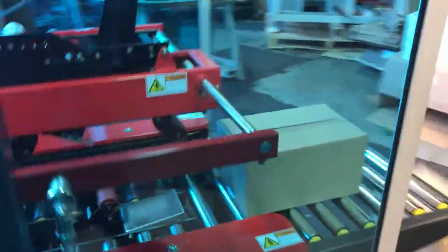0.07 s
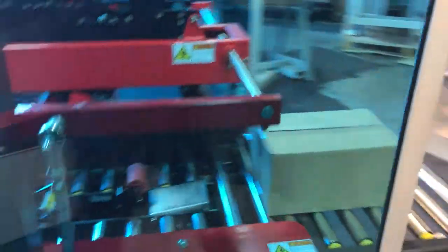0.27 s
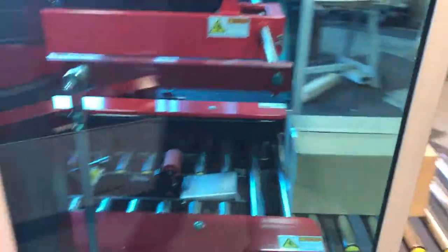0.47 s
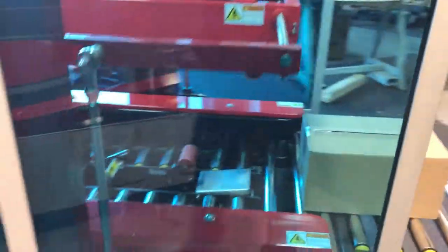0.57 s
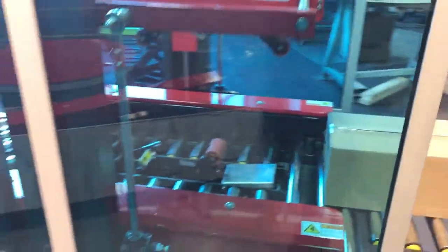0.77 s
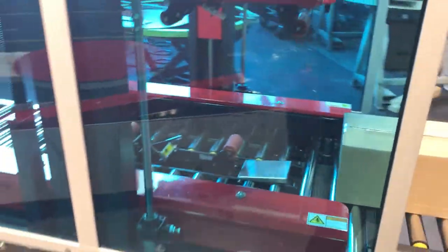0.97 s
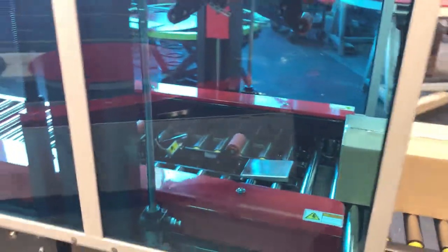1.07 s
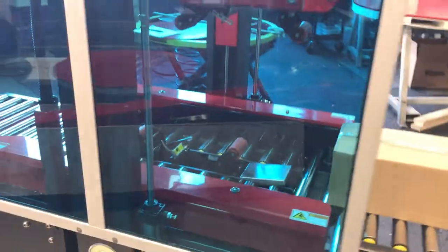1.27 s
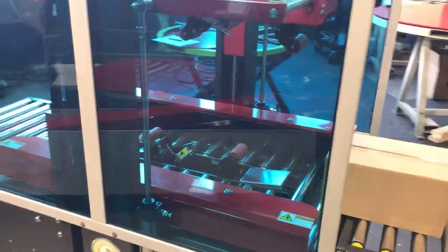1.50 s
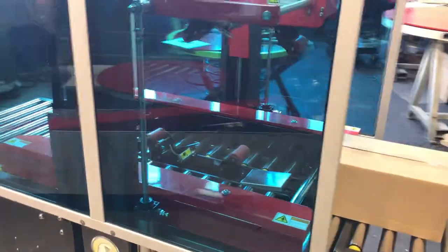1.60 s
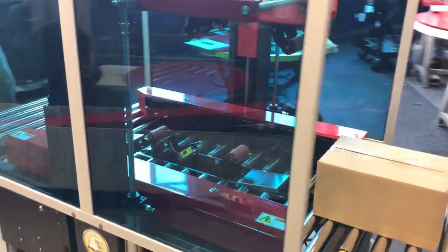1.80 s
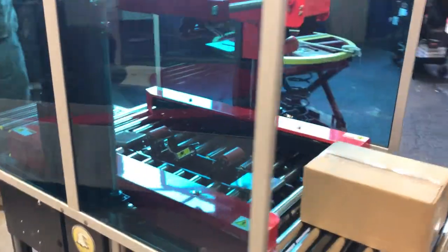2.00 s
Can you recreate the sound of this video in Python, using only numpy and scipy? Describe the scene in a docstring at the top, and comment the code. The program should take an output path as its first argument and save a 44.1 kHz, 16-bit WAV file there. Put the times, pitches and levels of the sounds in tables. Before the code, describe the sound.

A carton sealing machine hisses and clunks, then releases a loud jet of air.

```python
"""A carton sealer in a factory hall, heard close up, over the whir of its motor and belts.
Air hisses through a throttle. A steel arm clunks against its stop, rattling the guard panels and
a loose link, and the hiss goes on, whistling, while the press head lifts. The head ends its stroke
with a dull thump and a last thin hiss. Then a valve ticks and dumps the air in a loud,
sputtering jet that rings the frame and the hall."""
import sys
import numpy as np
from scipy import signal
from scipy.fft import rfft, irfft, next_fast_len
from scipy.io import wavfile
from scipy.ndimage import map_coordinates

SR = 44100
rng = np.random.default_rng(int(sys.argv[2]) if len(sys.argv) > 2 else 0)


def generate_wav(signal):
    """Clip the signal to [-1, 1] and save it as 16-bit WAV at the path in sys.argv[1]."""
    frames = np.transpose(np.atleast_2d(signal))
    scaled = np.clip(frames, -1, 1) * 32767
    pcm = np.round(scaled).astype(np.int16)
    wavfile.write(sys.argv[1], SR, pcm)


N = 90404

# Blows of the steel arm; the last row is a later rattle of the guard panels, played the same way. Each row:
# start in seconds, level in dB, thud and crack offsets in dB.
BLOWS = [(0.2234, -13, -10, 0.5), (0.2289, -14, 4, -8.5), (0.258, -32, 5, -4), (0.276, -39.5, 22.5, -11),
         (0.331, -37.5, 11, -1), (0.377, -44, 21, -3), (0.446, -38, 0, 8.5)]


def exhaust():
    """Turbulent jet noise: the valve sputters open, and the escaping air excites frame and hall."""
    # Course of the outflow. Each row: time in seconds, level in dB.
    outflow = [(1.36, -59), (1.419, -35.5), (1.426, -31), (1.48, -25.5), (1.56, -24), (1.63, -24.5),
               (1.7, -34.5), (1.8, -45), (2.0, -56.5)]
    # Spectra of the jet and its shrill edge. Each row: frequency in Hz, relative level in dB.
    jet_spectrum = [(70, -22), (120, -8), (170, -3), (245, -7), (360, -6), (520, -11.5), (600, -7.5),
                    (840, -4), (1000, -4.5), (1570, -4.5), (1810, -13.5), (2310, -7.5), (3000, -8.5),
                    (5300, -6), (8000, -15), (10400, -18), (15700, -32)]
    shrill_spectrum = [(3000, -15.5), (5200, -8), (7500, -23.5)]
    open_s, sputter_s, sputter_hz, sputter_db, turbulence_db = 1.429, 0.06, 50, 2.8, 0.9
    since = clock() - open_s
    pulsing = np.exp(-np.abs(since) / sputter_s) * np.cos(2 * np.pi * sputter_hz * since)
    sputter = amp(sputter_db * pulsing + turbulence_db * wobble(70.07))
    smooth_flow = level(outflow)
    flow = smooth_flow * sputter
    frame = frame_resonance(flow)
    fizz = sputter * port_fizz(open_s)
    tick = valve_tick()
    shrill = amp(-27) * (smooth_flow / smooth_flow.max()) ** 2 * noise(shrill_spectrum)
    return tick + fizz + shrill + frame + in_hall(flow * noise(jet_spectrum), wet_db=-4.5)


def frame_resonance(flow):
    """Forced resonance: the frame's modes store energy from the jet, each in turn as pressure falls."""
    # Each row: frequency in Hz, peak level in dB, t60 in seconds, time of best coupling in seconds.
    modes = [(172.2, -33, 1.9, 1.536), (360.4, -33.5, 0.77, 1.43), (826, -30, 0.27, 1.57),
             (903, -31.5, .35, 1.63), (1080, -38.5, 0.26, 1.48), (1538, -34.5, 0.32, 1.5),
             (1633, -30, 0.16, 1.65), (2006, -34, 0.42, 1.46), (2290, -32, .2, 1.54),
             (5165, -30.5, .2, 1.565)]
    flare_s, waver_rate = 0.043, 21.9
    t = clock()
    total = np.zeros(N)
    for hz, db, t60, best_s in modes:
        coupling = 1 / (1 + ((t - best_s) / flare_s) ** 2)
        retained = amp(-60 / (t60 * SR)) ** 2  # share of the energy left after one sample
        energy = signal.lfilter([1], [1, -retained], (flow * coupling) ** 2)
        waver = amp(1.2 * wobble(waver_rate))
        tone = np.sin(2 * np.pi * hz * t + 1.05 * wobble(waver_rate))
        total += amp(db) * np.sqrt(energy / energy.max()) * waver * tone
    return total


def port_fizz(open_s):
    """Direct sound: a sharp fizz comes straight from the exhaust port as it opens."""
    # Each row: frequency in Hz, relative level in dB.
    spectrum = [(800, -8), (1500, 8), (3000, -2), (6000, 0), (8500, 0.5), (10500, -11.5), (13000, -4),
                (15700, -20)]
    lead_s, attack_s, hold_s = 0.0078, 0.0033, 0.18
    attack = np.clip((clock() - open_s + lead_s) / attack_s, 0, 1)
    return amp(-28) * attack * held(0, open_s + hold_s, t60=0.5) * noise(spectrum)


def valve_tick():
    """A broadband transient: the valve ticks just before the air escapes."""
    # Each row: frequency in Hz, relative level in dB.
    spectrum = [(500, -18), (1600, 8), (4000, -5), (15000, -10)]
    return amp(-38.5) * fade(start=1.323, t60=0.05) * noise(spectrum)


def arm_clunk():
    """Impact excitation: each steel contact cracks, rings the arm and shakes the base."""
    # Modes of arm and base. Each row: frequency in Hz, relative level in dB, t60 in seconds.
    arm_modes = [(224, 1.5, 0.044), (292, -21, 0.61), (375.7, 6.5, 0.048), (403.4, 1.5, 0.075),
                 (556, -12, 0.061), (663, -10.5, 0.042), (860, -4, 0.032), (1080, 4, 0.035),
                 (1300, 0.5, 0.036), (1400, -0.5, 0.023), (4060, -12.5, 0.027)]
    base_modes = [(56, -17, 0.13), (84, 0.5, 0.067), (142, -8.5, 0.225)]
    # Each row: frequency in Hz, relative level in dB.
    crack_spectrum = [(200, -24), (700, -13), (1300, 1), (2000, 0.5), (2900, -2), (4200, 2), (7000, -15),
                      (15000, -18)]
    total = np.zeros(N)
    for start, db, thud_db, crack_db in BLOWS:
        arm = ring(start, arm_modes, rise_s=0.00052)
        thud = amp(thud_db) * ring(start, base_modes, rise_s=0.0078)
        crack = amp(crack_db - 4.5) * fade(start, t60=0.04) * noise(crack_spectrum)
        total += amp(db) * (arm + thud + crack)
    return total


def stop_snap():
    """A short contact has a wide spectrum: the arm's first blow snaps hard and rings the stop."""
    # Each row: frequency in Hz, relative level in dB.
    spectrum = [(500, -16), (1300, 9.5), (4000, 3.5), (9000, -11.5), (15000, -12)]
    # The stop's own ring. Each row: frequency in Hz, level in dB, t60 in seconds.
    modes = [(1170, -5.5, 0.0065)]
    start = BLOWS[0][0]
    return amp(-11) * fade(start, t60=0.014) * noise(spectrum) + ring(start, modes, rise_s=1 / SR)


def head_thump():
    """A cushioned impact excites low modes: the head lands, rattles at the contact and rebounds."""
    # Each row: start in seconds, level in dB, relative rattle level in dB.
    landings = [(1.112, -13, -12.5), (1.152, -30.5, -7), (1.19, -39, -24), (1.229, -28, -20)]
    # Each row: frequency in Hz, relative level in dB, t60 in seconds.
    head_modes = [(80, -15, 0.17), (147, -15, 0.2), (188, 1.5, 0.055), (242, 2, 0.065), (274.5, 5.5, .12),
                  (281, -17, 0.68)]
    # Each row: frequency in Hz, relative level in dB.
    rattle_spectrum = [(200, 2), (400, 10.5), (600, -1), (1100, 5), (2000, -6.5), (4000, -6), (8000, -17.5),
                       (15000, -18)]
    total = np.zeros(N)
    for start, db, rattle_db in landings:
        thump = ring(start, head_modes, rise_s=0.0032)
        rattle = amp(rattle_db) * fade(start, t60=0.12) * noise(rattle_spectrum)
        total += amp(db) * (thump + rattle)
    return total


def panel_rattle():
    """Damped vibration: the guard panels rattle on after the first blow."""
    # Each row: frequency in Hz, relative level in dB.
    spectrum = [(30, -12), (65, -7), (160, 0.5), (280, 2.5), (380, -3), (520, -10), (800, -6), (1150, -9.5),
                (1800, -9.5), (2500, -22), (5000, -36)]
    return amp(-22.5) * fade(BLOWS[0][0], t60=1.2) * noise(spectrum)


def loose_link():
    """Contact noise: a loose link clacks and drops back."""
    # Each row: start in seconds, level in dB.
    clacks = [(0.3316, -25), (.423, -38)]
    # Each row: frequency in Hz, relative level in dB.
    spectrum = [(700, -16), (1300, -9), (1700, 2.5), (2400, -1), (2900, -8), (4200, -8), (5300, -10.5),
                (6200, -27), (15000, -33)]
    return sum(amp(db) * held(start, start + 0.008, t60=0.04) * noise(spectrum) for start, db in clacks)


def throttle():
    """Turbulence at a constriction: the hiss changes colour at the clunk and dies at the end stop."""
    # Hiss before and after the clunk. Each row: frequency in Hz, relative level in dB.
    early_spectrum = [(100, -4), (360, 4.5), (520, -12.5), (1400, -3), (2700, -4), (4200, -3), (4900, -1),
                      (7000, -7.5), (9400, -8.5), (10300, -14), (11300, -6.5), (13300, -9.5), (15700, -11)]
    lift_spectrum = [(100, -31), (360, 0), (520, -7), (850, -9.5), (1110, 2.5), (1350, -6.5), (1630, 3.5),
                     (1900, -4), (2110, -1), (2400, -4.5), (3400, -0.5), (4600, 0), (5700, -3), (7100, -3),
                     (7800, -8.5), (9300, -7.5), (10400, -12.5), (11300, -6), (13400, -9), (15700, -9.5)]
    # Whistles before the clunk. Each row: frequency in Hz, width in Hz, boost in dB.
    early_whistles = [(3470, 62, 9.5), (4060, 220, 9.5), (4390, 140, 6)]
    # Course of the hiss during the lift. Each row: time in seconds, level in dB.
    lift_levels = [(0, -62), (.3, -38), (.55, -36), (.85, -35), (1.105, -36.5), (1.18, -77)]
    change_s, crossfade_s = 0.2, 0.14
    lift_share = np.clip((clock() - change_s) / crossfade_s, 0, 1)
    early = amp(-33.5) * noise(early_spectrum, early_whistles)
    lift = level(lift_levels) * (shifting_noise(lift_spectrum, count=7) + lift_whistles())
    air = np.sqrt(1 - lift_share) * early + np.sqrt(lift_share) * lift
    return air * amp(0.95 * wobble(24.9))


def lift_whistles():
    """Narrow-band noise: breathy whistles set in one by one, flare and drift together in pitch."""
    # Each row: frequency in Hz, level relative to the hiss in dB, start in seconds.
    whistles = [(3510, -18, 0.51), (4570, -17, 0.42), (5410, -18, 0.36), (6980, -14, 0.52),
                (11450, -18.5, 0.23), (13400, -21, .65)]
    width_hz, drift, flare_db, rise_s = 110, 0.008, 2.5, 0.1
    warped_time = np.cumsum(1 + drift * wobble(7.2)) / SR
    total = np.zeros(N)
    for hz, db, start in whistles:
        phase = 2 * np.pi * hz * warped_time
        tone = unit(wobble(width_hz) * np.cos(phase) + wobble(width_hz) * np.sin(phase))
        onset = np.clip((clock() - start) / rise_s, 0, 1)
        total += onset * amp(db + flare_db * wobble(10.4)) * tone
    return total


def bleed():
    """Flow noise: the last air bleeds off in a thin hiss after the head has stopped."""
    # Each row: frequency in Hz, relative level in dB.
    spectrum = [(500, -8), (1200, 3), (2500, -8), (4500, 3.5), (6300, 1.5), (7000, 4.5), (7500, -11),
                (10500, -11), (11500, -11), (15700, -17)]
    return amp(-49.5) * held(start=1.11, end=1.254, t60=0.17) * noise(spectrum)


def drive():
    """Rotating machinery gives a tone over broadband noise: an unsteady motor hum and belt rumble."""
    # Each row: frequency in Hz, level in dB.
    motor_tones = [(173, -51)]
    # Each row: frequency in Hz, relative level in dB.
    rumble_spectrum = [(25, -28), (50, -2), (80, 2), (170, 0.5), (300, -6.5), (380, -12.5), (520, -15.5),
                       (1000, -15), (1600, -19), (16000, -33.5)]
    hum = sum(amp(db + 0.44 * wobble(7.8)) * np.sin(2 * np.pi * hz * clock() + 0.32 * wobble(7.66))
              for hz, db in motor_tones)
    return hum + amp(-44.5 + 0.13 * wobble(11.5)) * noise(rumble_spectrum)


def in_hall(x, wet_db):
    """Reverberation: the direct sound plus a diffuse tail, each frequency dying at its own rate."""
    # Each row: frequency in Hz, t60 in seconds.
    decay_times = [(60, 0.97), (200, 1.94), (1000, 1.92), (2500, 1.56), (5000, 1.22), (8000, 0.89),
                   (14000, 0.34)]
    build_up_s = 0.0055
    hz, t, bands = signal.stft(rng.standard_normal(N), SR, nperseg=256)
    decay = amp(-60 * t / along(decay_times, hz)[:, None])
    tail = signal.istft(bands * decay, SR, nperseg=256)[1][:N]
    tail *= 1 - np.exp(-(clock() / build_up_s) ** 2)
    return x + amp(wet_db) * signal.fftconvolve(x, tail / np.linalg.norm(tail))[:N]


def ring(start, modes, rise_s):
    """Free vibration: a sum of damped modes, their levels and phases varying from blow to blow."""
    t = np.arange(SR // 2) / SR
    tones = np.zeros(len(t))
    for k, (hz, db, t60) in enumerate(modes):
        decay = amp(db + rng.normal() - 60 * t / t60)
        tones += decay * np.sin(2 * np.pi * hz * t + k * np.pi + 0.5 * rng.normal())
    return np.pad(tones * (1 - np.exp(-t / rise_s)), (round(start * SR), N))[:N]


def noise(spectrum, resonances=()):
    """Coloured noise of rms 1; a random ripple stands for interference between the guard panels."""
    ripple_db, ripple_step_hz = 3, 45.05
    knots = rng.standard_normal(4000)

    def gain(hz):
        ripple = ripple_db * hz / (hz + 500) * map_coordinates(knots, [hz / ripple_step_hz], mode="wrap")
        peaks = sum(db / (1 + (2 * (hz - centre) / width) ** 2) for centre, width, db in resonances)
        return amp(along(spectrum, hz) + ripple + peaks)
    return unit(filtered(rng.standard_normal(N), gain))


def shifting_noise(spectrum, count):
    """Equal-power crossfades through count noises, each with its own ripple."""
    place = np.linspace(0, count - 1, N)
    return sum(np.sqrt(np.clip(1 - np.abs(place - k), 0, 1)) * noise(spectrum) for k in range(count))


def fade(start, t60):
    """A sudden start and an exponential decay of 60 dB in t60 seconds."""
    t = clock() - start
    return (t >= 0) * amp(-60 * np.abs(t) / t60)


def held(start, end, t60):
    """Full level from start to end, then an exponential release."""
    t = clock()
    return ((t >= start) & (t < end)) + fade(end, t60)


def level(rows):
    """Gain at each sample from (seconds, dB) points."""
    return amp(np.interp(clock(), *np.transpose(rows)))


def wobble(rate):
    """A smooth random curve with rate knots a second."""
    coarse = np.arange(0, N + 64, 64) / SR
    curve = map_coordinates(rng.standard_normal(400), [coarse * rate], mode="wrap")
    return np.interp(clock(), coarse, curve)


def filtered(x, response):
    """Linear filtering: the spectrum of x times a frequency response."""
    size = next_fast_len(N + 8192)
    return irfft(rfft(x, size) * response(np.fft.rfftfreq(size, 1 / SR)), size)[:N]


def along(points, hz):
    """Interpolation of (Hz, value) points on a logarithmic frequency axis."""
    frequencies, values = np.transpose(points)
    return np.interp(np.log(hz + 1), np.log(frequencies + 1), values)


def amp(db):
    """Decibels to gain."""
    return 10 ** (np.asarray(db) / 20)


def unit(x):
    """Scale to rms 1."""
    return x / np.sqrt(np.mean(x ** 2) + 1e-20)


def clock():
    """Seconds at each sample."""
    return np.arange(N) / SR


def scene():
    """Superposition: the machine's sources add in one channel."""
    clunk = in_hall(arm_clunk(), wet_db=-17) + stop_snap() + loose_link() + panel_rattle()
    thump = in_hall(head_thump(), wet_db=-18)
    return (drive() + throttle() + clunk + thump + bleed() + exhaust())[None]


def record(dry):
    """Saturation and band limiting: the loudest peaks round off, deep bass thins, top treble is cut."""
    ceiling, bass_hz, top_hz = 0.72, 36, 15800
    rounded = dry[0] / (1 + (np.abs(dry[0]) / ceiling) ** 6) ** (1 / 6)
    return filtered(rounded, lambda hz: (hz < top_hz) * hz ** 4 / (hz ** 4 + bass_hz ** 4))[None]


dry = scene()
out = record(dry)
generate_wav(out)
```